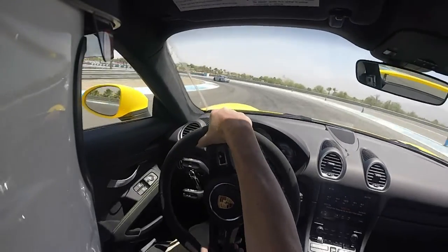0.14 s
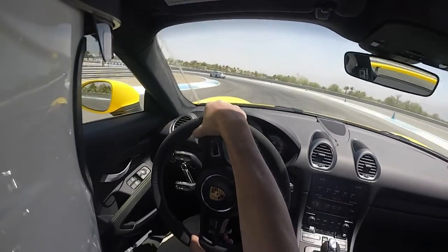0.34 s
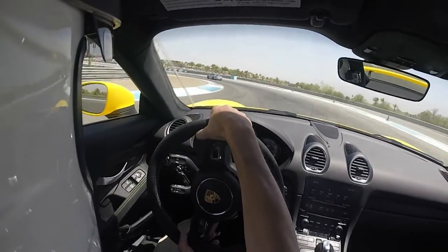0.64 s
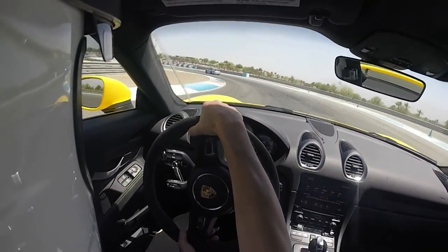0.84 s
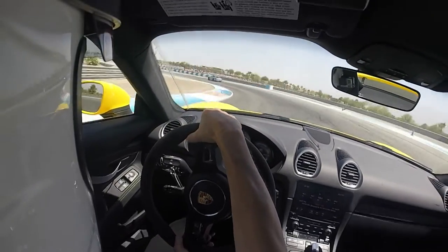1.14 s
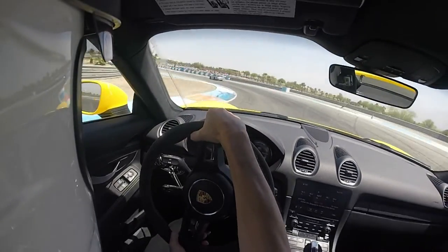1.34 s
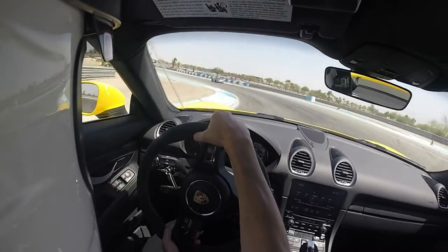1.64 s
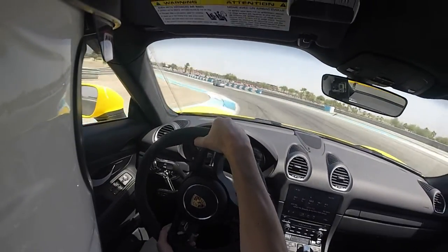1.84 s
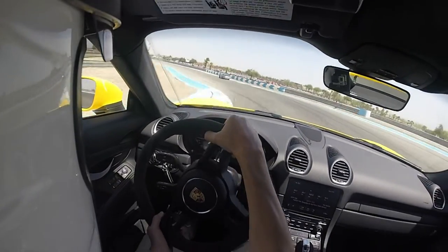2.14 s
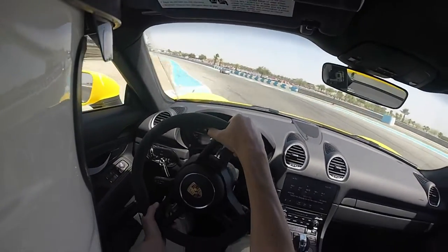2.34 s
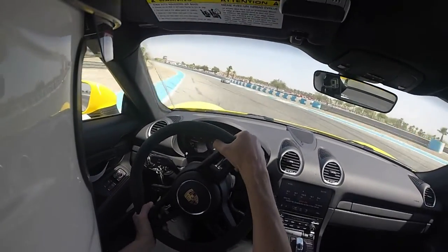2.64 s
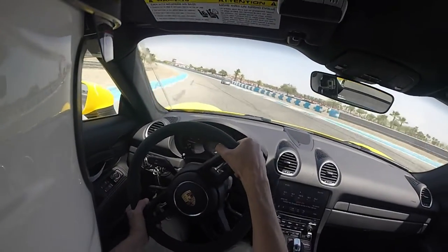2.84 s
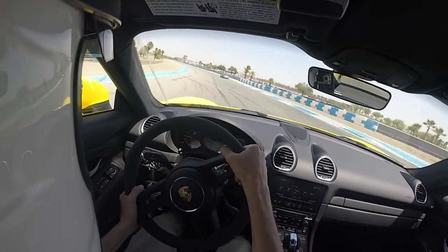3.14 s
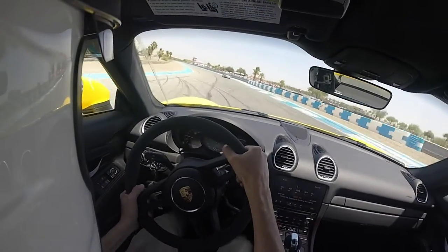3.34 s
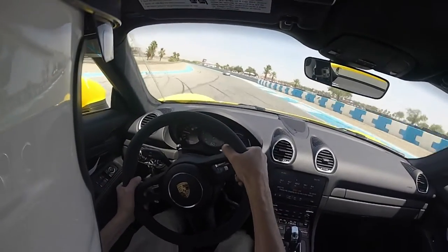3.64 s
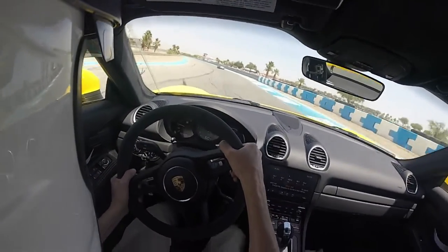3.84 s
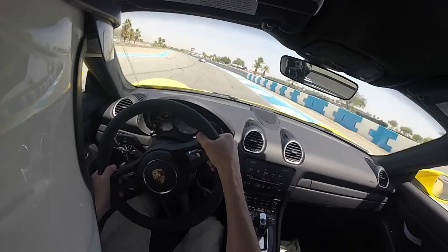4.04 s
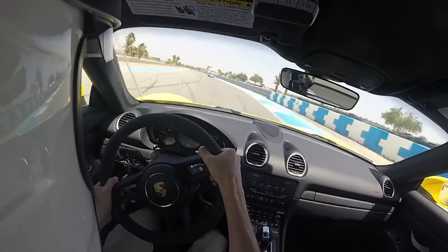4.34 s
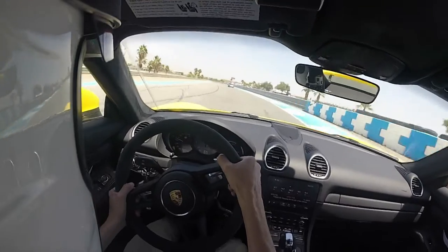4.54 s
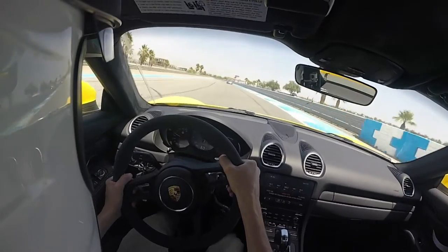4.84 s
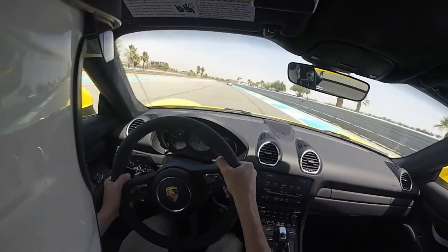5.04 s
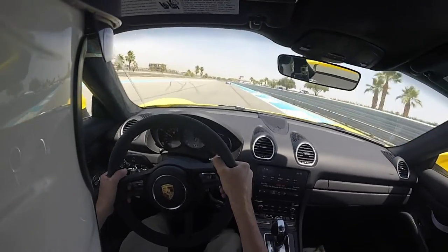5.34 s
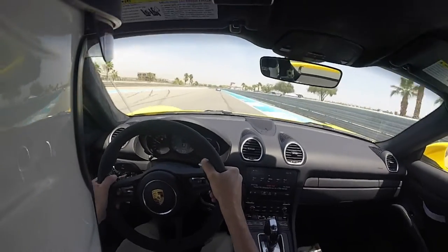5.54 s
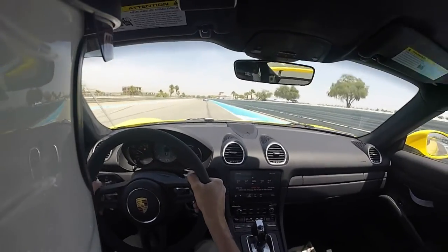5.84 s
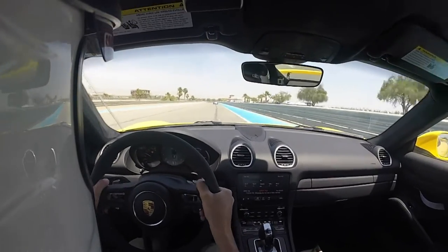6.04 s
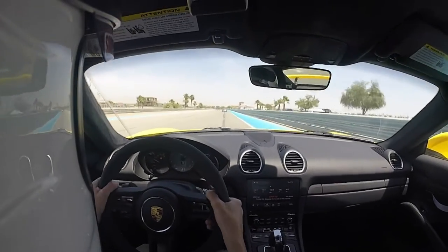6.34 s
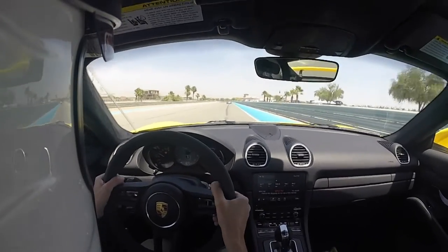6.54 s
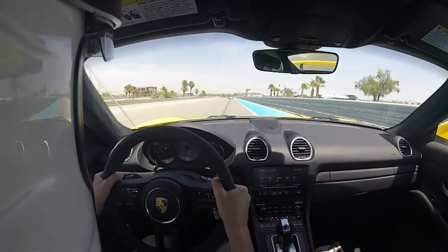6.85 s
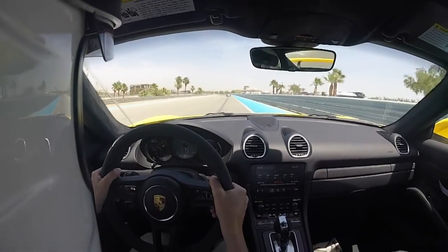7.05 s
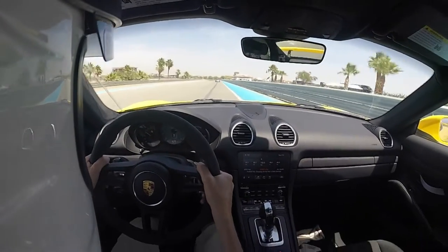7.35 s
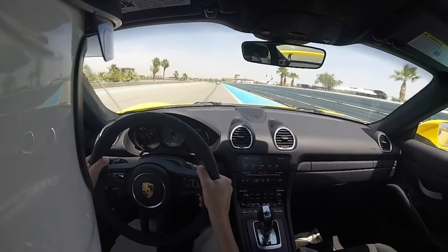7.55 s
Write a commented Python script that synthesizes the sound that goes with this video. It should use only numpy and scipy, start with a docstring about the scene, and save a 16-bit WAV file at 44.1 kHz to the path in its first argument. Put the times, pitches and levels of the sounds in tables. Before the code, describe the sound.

A six-cylinder sports car engine accelerates hard, shifts up once and pulls again, heard from inside the closed cabin over road rumble.

```python
"""A six-cylinder engine pulls through one gear, shifts up and pulls again, heard inside a closed sports
car on a race track. Its orders sweep through body and cabin resonances; the firing tone swells through
the tuned intake. Under it lie a low boom, road rumble, combustion rasp, wind hiss, a few faint
ticks, one bump over a seam and a gear whine."""
import sys
import numpy as np
from scipy.fft import rfft, irfft, next_fast_len
from scipy.io import wavfile
from scipy.ndimage import map_coordinates

SR = 44100
rng = np.random.default_rng(int(sys.argv[2]) if len(sys.argv) > 2 else 0)


def transcribe(u):
    """Save the signal u as a 16-bit wav file named by the first command-line argument.

    u: samples, shape (n,) or (channels, n), limited to [-1, 1]; the rate is SR.
    q: integer samples, one column per channel.
    """
    v = np.clip(np.atleast_2d(u).T, -1, 1)
    q = np.round(v * 32767).astype(np.int16)
    wavfile.write(sys.argv[1], SR, q)


N = 339570
SHIFT_S = 4.493

# four-stroke cycle rate, half the crank speed: time_s, cycle_hz
ENGINE_SPEED = [(0.0, 35.63), (0.35, 36.97), (0.75, 37.84), (1.35, 39.77), (1.75, 41.52), (2.35, 44.5),
                (2.55, 45.94), (3.15, 51.21), (3.35, 53.22), (3.95, 58.27), (4.35, 61.87), (4.44, 62.3),
                (4.47, 57.3), (4.505, 52.8), (4.535, 48.0), (4.56, 45.5), (4.7, 46.02), (5.1, 48.04),
                (5.7, 50.79), (6.3, 53.45), (7.7, 59.52)]
# resonances of body shell and cabin air: centre_hz, width_hz, gain_db
CABIN_MODES = [(408, 4.7, -55.9), (462.6, 32.1, -49.5), (523, 36, -50.5), (640, 45, -46.5), (671, 19, -45),
               (787.7, 20, -59.5), (854, 46.7, -52), (994.6, 14, -50.5), (1150, 37, -56), (1291, 14.8, -51),
               (1349.4, 55, -47), (1458, 39, -50.5), (1616, 34.8, -52.5), (1711.4, 41.5, -46.5),
               (1980, 40, -66.5), (2090, 15, -58.5), (2316, 87, -66), (2560, 140, -71.5), (2822, 63, -64),
               (2975, 45, -68), (3210, 37, -75.5)]
# noise against engine speed: cycle_hz, rasp_db, hiss_db
FLOW_LEVELS = [(34.8, -50.5, -63), (39, -49, -63), (44.3, -48.5, -63.5), (47, -46.5, -61.5),
               (52, -46.5, -61.5), (59.7, -43, -59), (65, -41, -56)]


def amp(db):
    """Decibels to gain."""
    return 10 ** (np.asarray(db) / 20)


def along(points, hz):
    """Read (hz, value) points on a log frequency axis."""
    point_hz, values = np.transpose(points)
    return np.interp(np.log(hz + 1), np.log(point_hz + 1), values)


def curves(rows, step=1):
    """Each column after time_s, interpolated every step samples."""
    time_s, *columns = np.transpose(rows)
    return [np.interp(np.arange(0, N, step) / SR, time_s, column) for column in columns]


def wobble(knot_hz, size=N, count=1):
    """Smooth random curves spanning the scene, shape (count, size)."""
    knots = rng.standard_normal((count, int(N * knot_hz / SR) + 4))
    return np.array([map_coordinates(k, [np.linspace(0, N * knot_hz / SR, size)]) for k in knots])


def coloured(x, gain):
    """Filter x by gain(hz)."""
    size = next_fast_len(N + 8192)
    return irfft(rfft(x, size) * gain(np.fft.rfftfreq(size, 1 / SR)), size)[..., :N]


def noise(spectrum, swell=1, response=lambda hz: 1):
    """White noise times swell, shaped by (hz, db) points and response(hz); rms 1."""
    white = rng.standard_normal(N)
    x = coloured(white * swell, lambda hz: response(hz) * amp(along(spectrum, hz)))
    return x / np.sqrt(np.mean(x ** 2) + 1e-20)


def mode_power(modes, hz):
    """Summed power response of resonances."""
    return sum(amp(2 * db) / (1 + ((hz ** 2 - centre ** 2) / (hz * width + 1e-9)) ** 2)
               for centre, width, db in modes)


def seat_gain(hz):
    """Engine to seat: body and cabin resonances, notched where two paths cancel."""
    # low resonances driven through mounts and floor: centre_hz, width_hz, gain_db
    body_modes = [(103, 10.5, -38), (138.8, 10, -35.5), (184, 11.1, -47.5), (221.2, 15.9, -44),
                  (294, 23, -50.5), (331.3, 12.6, -41.5), (408.4, 15, -53.6)]
    # cancellations: centre_hz, half_width_hz
    nulls = [(171.4, 11), (243, 3.6), (379, 10), (434, 3.5), (476, 2.9), (610, 2.5), (713, 25), (930, 6.1),
             (1075, 7.2), (1230, 8), (1547, 5.4), (1662, 5.1), (1800, 19)]
    notches = np.prod([1 - 0.97 / (1 + ((hz - centre) / half) ** 2) for centre, half in nulls], axis=0)
    return np.sqrt(mode_power(body_modes + CABIN_MODES, hz) * notches)


def shift_pulse(half_width_s=0.026, step=1):
    """Bell, 0 to 1, at the shift; the firing cuts and relights with a bark."""
    return np.exp(-((np.arange(0, N, step) / SR - SHIFT_S) / half_width_s) ** 2)


def engine_orders(step=128):
    """Unequal cylinders and pipes put tones on multiples of the cycle rate; each crosses resonances."""
    # source balance: order, low_revs_db, mid_revs_db, high_revs_db
    balance = [(2, 12, 7, 8), (3, 6, 4.0, 8), (4, -0.5, 13.0, 5), (5, 9.5, -5.5, 8.5), (7, 7, 16.5, 3.5),
               (8, 13.0, 17.5, -3.5), (9, -10.5, 9.0, -2), (10, 11.0, 3.5, -4.5), (11, 7.5, -5, -3),
               (13, -23, 4.5, -4), (14, -6, 5.5, -0.5), (15, 3.5, 2, -0.5), (16, -14, -1, 1.5),
               (17, -0.5, -4.0, 2), (19, -12, -2, 0), (20, -3.5, 7.5, -5), (21, -1, 4.5, 0.5),
               (22, -11, 9, -2), (23, -9, 1, -3.5), (24, -1.5, 0, -2), (25, -5.5, -12, -1.5),
               (26, 2.0, 1, -7.5), (27, -4, 4.5, -2.5), (28, 3, 5.0, -10), (29, -4.5, -8.5, 8.5),
               (30, 2, 4, -2), (31, 8.5, 1, -3), (32, -4.5, -2.5, -8.5), (33, 2.5, -1.5, -2.5),
               (34, -0.5, -7.5, -0.5), (35, 6, 4, 0.5), (36, -3.0, 4.5, -3.5), (37, -0.5, -4.5, -10.5),
               (38, -2.0, 6.5, -4), (39, -7, -5, -3.5), (40, -4.0, -10, -4), (41, -4, -4.5, -5.5),
               (42, 6.5, 5, 0.5), (45, -2, 0, 2.5), (47, 4.5, 5, 4), (52, 5, 2.5, 1), (54, -1, -1.5, -3.5)]
    low_mid_high_hz = (38, 48, 60)
    upper_db, cut_db_per_order, load_db_per_hz = -6, -0.2829, 0.6364
    cycles = np.cumsum(curves(ENGINE_SPEED)[0] / SR)
    angle = (2 * np.pi * (cycles % 1)).astype(np.float32)
    cycle_hz = curves(ENGINE_SPEED, step)[0]
    orders = {round(order): np.interp(cycle_hz, low_mid_high_hz, db) for order, *db in balance}
    for order in range(25, 61):
        orders.setdefault(order, upper_db)
    load_db = -2.5 + load_db_per_hz * (cycle_hz - 49.05)  # pulls harder as it revs
    cut_db = cut_db_per_order * shift_pulse(half_width_s=0.045, step=step)
    # many paths through the shell: they cancel deeply but add little
    size, count = len(cycle_hz), len(orders)
    drifts_db = np.minimum(3.9 * wobble(2.6, size, count) + 2.5 * wobble(12, size, count), 1.2)
    phases = rng.uniform(0, 2 * np.pi, count).astype(np.float32)
    samples, sound = np.arange(N), np.zeros(N)
    for (order, db), drift_db, phase in zip(orders.items(), drifts_db, phases):
        depth = min(0.51 + 0.13 * max(order - 8, 0), 1.4)  # higher orders drift more
        depth *= np.clip(1 - 0.05 * db, 0.3, 1.6)  # so do weaker ones
        gain = amp(db + load_db + depth * drift_db + order * cut_db) * seat_gain(order * cycle_hz)
        sound += np.interp(samples, samples[::step], gain) * np.sin(order * angle + phase)
    return np.sqrt(2) * amp(4.5 * shift_pulse()) * sound


def firing_tone(cylinders=6):
    """Each cylinder fires once a cycle; the intake pipe sets the level of three harmonics."""
    # fundamental through the intake: pitch_hz, rms_db
    first = [(212, -50), (228, -45.5), (240, -50), (251, -31), (283, -32), (300, -20.5), (333, -19.5),
             (347, -27), (360, -27.5), (369, -47), (378, -19)]
    # second harmonic: pitch_hz, rms_db
    second = [(430, -68), (520, -52), (550, -44.5), (580, -56.5), (610, -44), (640, -40.5), (655, -49.5),
              (673, -31.5), (697, -50), (720, -43.5), (750, -52)]
    # third harmonic: pitch_hz, rms_db
    third = [(640, -55.5), (670, -48.5), (712, -63), (760, -64), (810, -69.5), (860, -52.5), (900, -60.5),
             (985, -49), (1030, -61), (1080, -45.5), (1120, -57)]
    firing_hz = cylinders * curves(ENGINE_SPEED)[0]
    angle = 2 * np.pi * np.cumsum(firing_hz) / SR
    flutter_db = wobble(11, count=3) * [[0.4], [1.2], [2.2]]
    bark_db = 2.2 * shift_pulse()
    sound = np.zeros(N)
    for k, intake in enumerate((first, second, third), 1):
        level_db = along(intake, k * firing_hz) + flutter_db[k - 1] + k * bark_db
        sound += amp(level_db) * np.sin(k * angle)
    return np.sqrt(2) * sound


def low_boom():
    """A low boom that wavers in pitch and level, then climbs with road speed."""
    # boom track: time_s, pitch_hz, rms_db
    track = [(0, 34.8, -42.5), (1.6, 37.8, -42), (1.8, 31.83, -39), (2.6, 32.1, -42.5), (3.3, 28.9, -42),
             (3.6, 27.5, -43), (5, 32.1, -39.5), (5.4, 33.45, -45.5), (6.3, 34.66, -51.5),
             (6.6, 36.3, -37.5), (7, 38.5, -49), (7.7, 38.5, -50)]
    pitch_hz, level_db = curves(track)
    phase = 2 * np.pi * np.cumsum(pitch_hz) / SR + 0.76 * wobble(10)[0]
    return np.sqrt(2) * amp(level_db + 3.6 * wobble(6.5)[0]) * np.sin(phase)


def road_rumble():
    """Low road noise, growing overall."""
    # rumble spectrum: freq_hz, density_db
    spectrum = [(12, -7), (22, -4), (34, -7.5), (60, -6.5), (110, 1.5), (180, -8), (290, -8), (460, -16.5),
                (700, -29.5), (1200, -34.5), (2000, -46), (4000, -120)]
    # rumble level: time_s, rms_db
    levels = [(0, -40), (1.5, -38), (3, -36.5), (4.3, -33), (5.5, -35.5), (7.7, -32.5)]
    return amp(curves(levels)[0]) * noise(spectrum)


def flow_db():
    """Rasp and hiss levels; the hot gas lags the revs by 50 ms and wind adds a slow rise."""
    cycle_hz, *columns = np.transpose(FLOW_LEVELS)
    lagged_hz = np.pad(curves(ENGINE_SPEED)[0], (SR // 20, 0), "edge")[:N]
    wind_db = 0.26 * np.arange(N) / SR
    return [np.interp(lagged_hz, cycle_hz, db) + wind_db for db in columns]


def crank_swell():
    """Slight gain ripple per crank turn and per cycle."""
    angle = 2 * np.pi * np.cumsum(curves(ENGINE_SPEED)[0]) / SR
    return 1 + 0.047 * np.sin(2 * angle) + 0.042 * np.sin(angle)


def combustion_rasp():
    """Combustion noise ringing the cabin."""
    # tilt before the cabin: freq_hz, gain_db
    tilt = [(300, -35), (700, -11), (1500, -7), (2200, -5.5), (3000, 2.5), (3400, -4.5), (4200, -19),
            (6000, -92.5)]
    rasp = noise(tilt, crank_swell(), lambda hz: np.sqrt(mode_power(CABIN_MODES, hz)) ** 0.79)
    rasp_db, _ = flow_db()
    return amp(rasp_db + 0.84 * wobble(8)[0]) * rasp


def wind_hiss():
    """Wind and intake air, rising with the revs."""
    # hiss spectrum: freq_hz, density_db
    spectrum = [(2500, -47.5), (3300, -6.5), (3450, -1), (3600, 1.5), (3900, -2), (4200, -4), (4450, -0.5),
                (4700, 1.5), (5100, -3.5), (6000, -6), (6400, -8.5), (7000, -12.5), (8200, -24.5),
                (11000, -48.5)]
    _, hiss_db = flow_db()
    return amp(hiss_db + 0.4 * wobble(7.2)[0]) * noise(spectrum, crank_swell())


def top_hiss(rms_db=-75.5):
    """Faint steady hiss in the high treble."""
    # hiss spectrum: freq_hz, density_db
    spectrum = [(5000, -23), (7500, -5), (8600, -1.5), (9600, -3.5), (11000, -5.5), (12500, -10.5),
                (14000, -12), (14300, -12), (15000, -13.5), (15300, -33.5)]
    return amp(rms_db) * noise(spectrum)


def ticks():
    """Faint brushing ticks: bright noise puffs with an abrupt onset."""
    # puffs: start_s, relative_db, length_s
    puffs = [(1.147, -51.5, 0.009), (2.815, -54, 0.024), (4.299, -51, 0.026), (5.837, -55, 0.014),
             (6.287, -43.5, 0.016), (7.468, -49, 0.012)]
    # puff spectrum: freq_hz, density_db
    spectrum = [(1700, -32), (2400, -0.5), (2900, 0.5), (3700, -9.5), (4800, -14), (6200, -14),
                (8000, -28.5), (10500, -32), (13500, -37), (16000, -48)]
    t = np.arange(N) / SR
    envelope = sum(amp(db) * (t > start_s) * np.exp(-(np.abs(t - start_s) / length_s) ** 3)
                   for start_s, db, length_s in puffs)
    return amp(2.5) * envelope * noise(spectrum)


def seam_bump():
    """The wheels cross a seam; the body drops with a low, damped thud."""
    # thud: start_s, level_db, pitch_hz, t60_s
    thuds = [(2.813, -17.5, 29.6, 0.3)]
    sound = np.zeros(N)
    for start_s, level_db, pitch_hz, t60_s in thuds:
        age_s = np.maximum(np.arange(N) / SR - start_s, 0)
        sound -= amp(level_db - 60 * age_s / t60_s) * np.sin(2 * np.pi * pitch_hz * age_s)
    return sound


def gear_whine(mesh_order=23.5):
    """Gear mesh tone, heard only where it meets a resonance."""
    # whine at the seat: pitch_hz, rms_db
    levels = [(1150, -76), (1330, -62.5), (1390, -49.5), (1440, -61.5), (1480, -66)]
    mesh_hz = mesh_order * curves(ENGINE_SPEED)[0]
    level_db = along(levels, mesh_hz) + 2.5 * wobble(15)[0]
    return np.sqrt(2) * amp(level_db) * np.sin(2 * np.pi * np.cumsum(mesh_hz) / SR)


def scene():
    """All sources at the seat, mono."""
    tones = engine_orders() + firing_tone() + gear_whine() + low_boom()
    rush = road_rumble() + combustion_rasp() + wind_hiss() + top_hiss()
    return (tones + rush + ticks() + seam_bump())[None]


def record(dry):
    """Brick-wall low-pass."""
    top_hz = 15300
    return coloured(dry, lambda hz: hz < top_hz)


dry = scene()
out = record(dry)
transcribe(out)
```